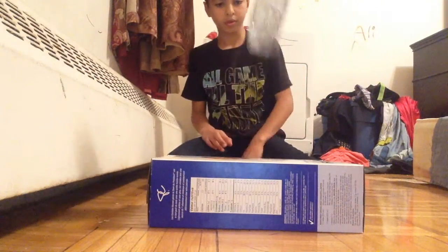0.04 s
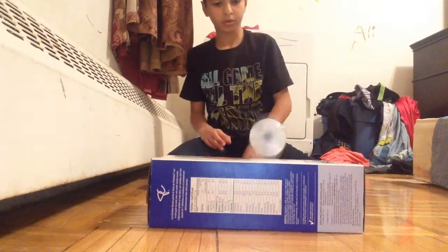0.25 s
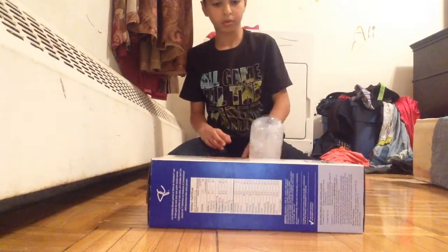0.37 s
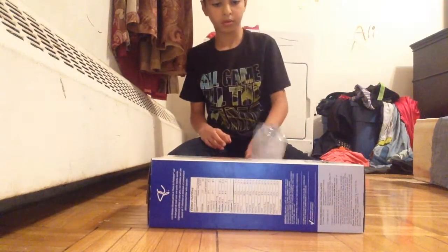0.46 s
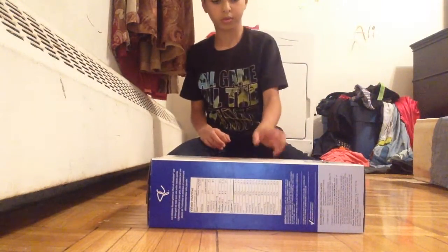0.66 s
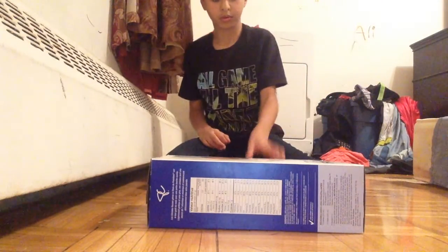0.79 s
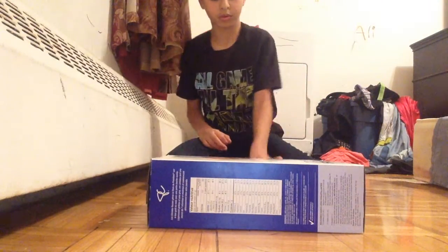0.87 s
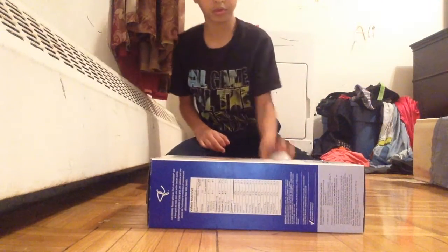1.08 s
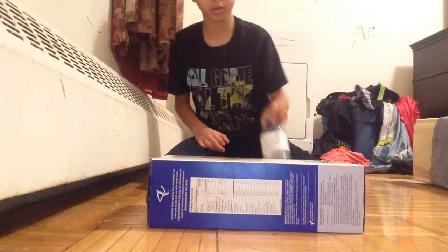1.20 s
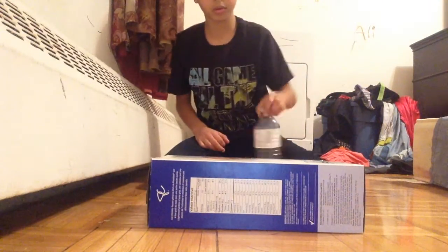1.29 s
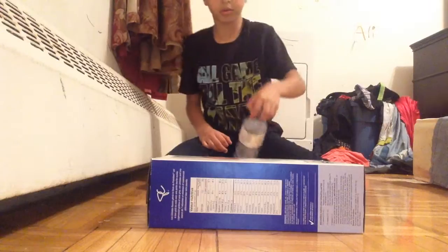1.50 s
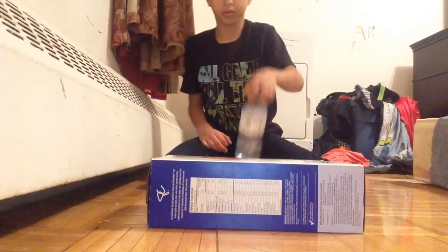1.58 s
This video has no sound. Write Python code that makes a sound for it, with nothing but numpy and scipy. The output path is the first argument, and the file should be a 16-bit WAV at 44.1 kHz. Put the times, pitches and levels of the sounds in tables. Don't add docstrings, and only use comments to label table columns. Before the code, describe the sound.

A part-filled plastic water bottle lands on a hollow cardboard box, then knocks onto a wooden floor

```python
import sys
import numpy as np
from scipy import signal
from scipy.fft import rfft, irfft
from scipy.io import wavfile
from scipy.ndimage import uniform_filter1d

SR = 44100
rng = np.random.default_rng(int(sys.argv[2]) if len(sys.argv) > 2 else 0)


def pcm_store(signal):
    levels = np.round(np.clip(np.atleast_2d(signal), -1, 1) * 32767)
    wavfile.write(sys.argv[1], SR, levels.astype(np.int16).T)


def elevation(decibels):
    levels = np.asarray(decibels, float)
    return 10 ** (levels / 20)


N = 72765

# [f/Hz, level/dB, t60/s]
NECK_MODES = [(647, -32, 0.11), (800, -8.5, 0.03), (884, -8, 0.058), (1046, 5, 0.014), (1354, -4.5, 0.016),
              (1589, -8, 0.032), (2144, 0.5, 0.015)]


def evened(x):
    return x / np.sqrt(np.mean(x ** 2) + 1e-20)


def read(points, hz):
    f, value = np.transpose(points)
    return np.interp(np.log(hz + 1), np.log(f + 1), value)


def add(mix, s, sound):
    at = round(s * SR)
    sound = sound[max(-at, 0):]
    part = mix[max(at, 0):][:len(sound)]
    part += sound[:len(part)]


def colour(x, points, tilt_db=0.):
    dull_hz = 6850
    hz = np.fft.rfftfreq(len(x), 1 / SR)
    shut = np.minimum(hz / points[0][0], 1) ** 2
    octaves = np.log2((hz + 20) / 2000)
    treble = (hz / dull_hz) ** 2 / (1 + hz / dull_hz)
    gain = elevation(read(points, hz) + tilt_db * (octaves + treble))
    return irfft(rfft(x) * shut * gain, len(x))


def still_air():
    # [f/Hz, level/dB per Hz]
    air_spectrum = [(40, -51.5), (100, -7), (165, -0.5), (280, -7.5), (500, -17.5), (1400, -16),
                    (5000, -25), (15500, -27)]
    return elevation(-61.5) * evened(colour(rng.standard_normal(N), air_spectrum))


def shuffle():
    # [t/s, level/dB]
    moves = [
        (0, -53.5),
        (0.152, -72),
        (0.299, -33.5),
        (.4, -48),
        (0.598, -34.5),
        (.76, -64),
        (.95, -62.5),
        (1.3, -60.5),
        (1.45, -65.5),
    ]
    s, db = np.transpose(moves)
    band = signal.butter(3, [135, 454], "bandpass", fs=SR, output="sos")
    rumble = evened(signal.sosfilt(band, rng.standard_normal(N)))
    return rumble * elevation(2 + np.interp(np.arange(N) / SR, s, db))


def grains(rows, spectrum):
    grains_per_s, spread_db, surge_db = 9000, 2.5, 1.3
    out, t = np.zeros(N), np.arange(22000) / SR
    size = elevation(spread_db * np.minimum(rng.exponential(1, (len(rows), 22000)), 5))
    draw = rng.uniform(-1, 1, size.shape)
    drops = size * np.sign(draw) * (abs(draw) < grains_per_s / SR)
    surge = evened(uniform_filter1d(rng.standard_normal(size.shape), size=350))
    drops = drops * elevation(surge_db * surge)
    for (s, swell, db, t60, tilt_db), d in zip(rows, drops):
        rise = np.sin(np.pi / 2 * np.minimum(t / swell, 1))
        fall = elevation(db - 60 * np.maximum(t - swell, 0) / t60)
        add(out, s, rise * fall * evened(colour(d, spectrum, tilt_db)))
    return out


def water_spray():
    # [start t/s, swell/s, level/dB, t60/s, tilt/dB per octave]
    sloshes = [(-.03, 0.017, -43, 0.28, 1.5), (.204, 0.051, -32.5, 0.28, 2), (.315, 0.029, -35, 0.21, 1.5),
               (.412, 0.016, -38, 0.59, -1), (.515, 0.0028, -35.5, 0.42, -2), (.645, 0.01, -40, 0.55, -2),
               (.685, 0.023, -31, 0.27, -1.5), (.85, 0.14, -60.5, 0.6, 2), (1.049, 0.039, -60, 0.35, 1.5),
               (1.13, 0.054, -56.5, 0.8, 1), (1.24, 0.024, -55, 0.43, 0.5)]
    # [f/Hz, level/dB per Hz]
    spray_spectrum = [(700, 3.5), (1300, 0), (2500, 0), (4500, -4), (7500, -11.5), (9500, -16.5),
                      (13500, -14.5), (15500, -22.5)]
    return grains(sloshes, spray_spectrum)


def climbing_notes(rows, rise_s):
    climb_per_s = .3
    out, t = np.zeros(N), np.arange(9000) / SR
    for s, hz, db, t60 in rows:
        shape = elevation(db - 60 * t / t60) * np.minimum(t / rise_s, 1)
        add(out, s, shape * np.sin(2 * np.pi * hz * (t + climb_per_s * t ** 2 / 2)))
    return out


def pings():
    # [t/s, f/Hz, level/dB, t60/s]
    ping_events = [(.002, 1690, -50, .05), (.007, 3350, -47, .035), (.028, 1690, -54, .08),
                   (.056, 700, -52, .05), (.2025, 2100, -15, .02), (.316, 2700, -29, .015),
                   (.337, 2600, -36, .04), (.472, 1480, -36, .03), (.5205, 3050, -28, .03),
                   (.5205, 5200, -34, .02), (.532, 2750, -33, .02), (.721, 2250, -35, .07)]
    return climbing_notes(ping_events, 0.00067)


def ticks():
    # [t/s, level/dB, length/s, tilt/dB per octave, rise/s]
    snaps = [(.2022, -21, 0.002, -2.5, 0.00035), (0.3135, -19, 0.0021, -1, .0006),
             (0.335, -32, 0.0022, -7.5, .001), (0.343, -39, .002, -1, 0.0014), (0.367, -37, .003, -4, .002),
             (0.4116, -22, 0.0026, -8.5, 0.0007), (0.505, -43, .002, -2.5, .001),
             (0.511, -38, 0.002, -5, .001), (0.521, -29, .003, -4, 0.0034),
             (.5525, -42, 0.0026, -3, 0.0017), (0.65, -56, 0.0013, -13, 0.00087),
             (.696, -27.5, 0.0014, -12, 0.0003), (0.073, -51.5, 0.008, -6.5, 0.0023),
             (1.621, -60.5, 0.0021, 2, .001)]
    # [f/Hz, level/dB]
    shell_spectrum = [(1500, -9), (3100, 0), (4800, -9), (6100, -7), (8500, -11), (11000, -4), (12300, -8),
                      (14200, -1)]
    lead_s, dent_depth = .004, 1.5
    out, t = np.zeros(N), np.arange(-lead_s, .04, 1 / SR)
    dent = dent_depth * (abs(t) < .5 / SR)
    for s, db, length, tilt_db, rise in snaps:
        swell = np.clip(1 + t / max(rise, 1e-4), 0, 1)
        fall = np.exp(-np.maximum(t, 0) / max(length, 1e-4))
        burst = (rng.standard_normal(len(t)) - dent) * swell * fall
        sound = colour(burst, shell_spectrum, tilt_db)
        add(out, s - lead_s, elevation(db) * sound / np.sqrt(np.sum(sound ** 2) / 300))
    return out


def knocks(rows, modes, blow=1, rise_s=1e-5):
    rattle_size, detune, most_cycles = .018, .01, 45
    out, t = np.zeros(N), np.arange(12000) / SR
    u = t[:4000]
    for s, db, contact, rattle in rows:
        fade = np.exp(-u / max(rattle, 1e-4)) * np.minimum(u / rise_s, 1)
        force = rattle_size * rng.standard_normal(4000) ** 3 * fade
        force[0] = blow
        push = u[:400] / max(contact, 2e-5)
        force = np.convolve(force, push * np.exp(-3 * push))
        ring = np.zeros(len(t))
        for hz, mode_db, t60 in modes:
            a, b = rng.uniform(-1, 1, 2)
            fall = elevation(mode_db + b - 60 * t / min(t60, most_cycles / hz))
            ring += fall * np.sin(2 * np.pi * hz * (1 + detune * a) * t)
        sound = signal.fftconvolve(force, ring)
        add(out, s, -elevation(db) * sound / np.sqrt(np.mean(sound[:900] ** 2)))
    return out


def box_knocks():
    # [t/s, level/dB, contact/s, rattle/s]
    hits = [
        (.2022, -10, 0.00025, 0.0077),
        (.2075, -14, 0.00023, 0.0032),
        (.2125, -8.5, 0.00051, 0.0077),
        (.2185, -19, 0.00021, 0.012),
        (.2215, -12.5, 0.00073, 0.0089),
        (.246, -16.5, .0005, 0.011),
        (.305, -30, 0.00085, 0.0065),
    ]
    # [f/Hz, level/dB, t60/s]
    box_modes = [(316.6, 3, 0.2), (339, -11, 0.081), (413.6, -3, 0.034), (457, 2.5, 0.035),
                 (540.5, -4, .03), (658, -2, 0.032), (738, -8.5, 0.031), (834, -4, 0.032),
                 (1020, -4.5, 0.026), (1086, -19.5, 0.021), (1240, -9, 0.017), (1300, -18, 0.016),
                 (2120, -7, 0.018), (3050, -8.5, 0.0095)]
    return knocks(hits, box_modes)


def glugs():
    # [t/s, f/Hz, level/dB, t60/s]
    pockets = [(.2025, 440, -11, .04), (.212, 314, -10, .15), (.224, 660, -18, .06), (.63, 885, -38, .12),
               (.652, 1000, -29, .04), (.69, 780, -22, .036), (.698, 572, -21, .07),
               (.699, 339, -14.5, .16), (.99, 910, -46, .06), (.99, 660, -46, .057),
               (1.144, 262, -49.5, .11), (1.29, 767, -50, .1), (1.3, 310, -50, .08), (1.366, 983, -49, .07)]
    return climbing_notes(pockets, .006)


def box_rocks():
    # [t/s, level/dB, contact/s, rattle/s]
    rocks = [
        (.2145, -24, 0.0014, 0.011),
        (.269, -28, 0.0018, 0.01),
        (.319, -28, 0.0022, 0.0048),
    ]
    # [f/Hz, level/dB, t60/s]
    side_modes = [(185.3, -13, 0.067), (213, 2.5, 0.085), (262, -3.5, 0.031)]
    return knocks(rocks, side_modes)


def hum():
    # [t/s, f/Hz, level/dB]
    tilt_path = [
        (.25, 315, -43),
        (0.298, 318, -24),
        (0.401, 320, -39),
        (0.509, 224.4, -39.5),
        (0.549, 270, -34.5),
        (0.588, 323.3, -28),
        (.65, 340, -36),
        (0.801, 344.8, -48),
        (0.889, 345, -43),
        (1.002, 340, -65),
    ]
    width_hz = 18
    s, hz, db = np.transpose(tilt_path)
    t = np.arange(N) / SR
    r = np.exp(-np.pi * width_hz / SR)
    noise = rng.standard_normal(N) + 1j * rng.standard_normal(N)
    slow = signal.lfilter([1], np.poly([r, r]), noise)
    slow = slow / (abs(slow) + .5 * np.abs(slow).mean())
    phase = 2 * np.pi * np.cumsum(np.interp(t, s, hz)) / SR
    tone = (slow * np.exp(1j * phase)).real
    return evened(tone) * elevation(np.interp(t, s, db, left=-120, right=-120))


def cap_knocks():
    # [t/s, level/dB, contact/s, rattle/s]
    hits = [
        (.313, -27.5, 0.00012, 0.012),
        (.5095, -31, 0.00056, 0.015),
        (.654, -29.5, 0.00017, 0.0066),
        (.6885, -27.5, 0.00025, 0.012),
    ]
    return knocks(hits, NECK_MODES)


def floor_knocks():
    # [t/s, level/dB, contact/s, rattle/s]
    hits = [
        (.411, -9, 0.00026, 0.0054),
        (.4158, -13.5, 0.00055, 0.012),
        (.4235, -15, 0.00031, 0.0043),
        (.439, -16.5, 0.00054, 0.012),
        (.5125, -23, 0.002, .0027),
        (.525, -41, .0015, 0.0089),
        (.547, -28, 0.0016, 0.011),
        (1.14, -39.5, 0.0032, 0.023),
        (1.172, -47, 0.002, 0.0071),
        (1.262, -57, 0.0016, 0.016),
    ]
    # [f/Hz, level/dB, t60/s]
    board_modes = [(206.5, -20, 0.034), (233, 7.5, 0.03), (361, 0.5, 0.078), (455, -2, 0.014),
                   (528, 5, .03), (654, -1, 0.014), (847, -4.5, 0.017), (1074, 4, 0.0093),
                   (1330, 13.5, 0.0052), (1680, -13.5, .01), (2030, -6.5, 0.0064), (2840, -20, .005),
                   (3615, -28, 0.0054)]
    return knocks(hits, board_modes)


def scuffs():
    # [t/s, level/dB, contact/s, rattle/s]
    drags = [
        (.632, -37.5, 0.00066, .026),
        (.92, -55.5, 0.00039, 0.032),
        (.95, -55, 0.000059, .035),
        (.99, -50.5, 0.00038, 0.0097),
        (1.038, -57.5, 0.00039, 0.081),
        (1.134, -50, 0.00019, 0.041),
        (1.258, -52.5, 0.0003, 0.042),
        (1.362, -59, 0.00042, 0.018),
    ]
    return knocks(drags, NECK_MODES, blow=0, rise_s=0.0051)


def side_knocks():
    # [t/s, level/dB, contact/s, rattle/s]
    hits = [
        (.696, -28.5, 0.0002, 0.002),
        (.7018, -21.5, 0.00012, 0.0026),
        (.87, -51.5, 0.00015, 0.011),
        (1.3, -51, 0.0016, .01),
    ]
    # [f/Hz, level/dB, t60/s]
    bottle_modes = [(355, -4.5, 0.14), (574, 5, 0.051), (720, -5, 0.024), (1230, -22, 0.018),
                    (1480, -6.5, .03), (1710, -6, 0.041), (2440, -29.5, 0.017), (2910, -29, .015)]
    return knocks(hits, bottle_modes)


def label_rustles():
    # [start t/s, swell/s, level/dB, t60/s, tilt/dB per octave]
    rustles = [
        (.94, 0.017, -62, 0.19, -2.5),
        (1.135, 0.0075, -60, 0.22, -2),
        (1.165, 0.019, -63.5, 0.18, -2.5),
        (1.262, 0.032, -59, 0.33, 2),
        (1.292, 0.017, -50.5, .08, 3.5),
    ]
    # [f/Hz, level/dB per Hz]
    label_spectrum = [(1200, 1.5), (3000, -11), (7500, -1.5), (8800, -18), (11000, -21.5), (12500, -6),
                      (15000, -14)]
    return grains(rustles, label_spectrum)


def room(x):
    # [delay t/s, level/dB]
    walls = [(.0075, -18), (.0118, -11), (.0205, -16), (.027, -17)]
    # [f/Hz, t60/s]
    decay = [(150, .33), (500, .26), (1300, .22), (6000, .26), (15000, .2)]
    taps = np.zeros(SR // 2)
    at = np.arange(500, len(taps) - 20, 20)
    taps[at + rng.integers(0, 20, len(at))] = rng.choice([-1., 1.], len(at))
    hz, t, z = signal.stft(taps, SR, nperseg=256)
    fall = elevation(-60 * t / read(decay, hz)[:, None])
    tail = signal.istft(z * fall, SR, nperseg=256)[1]
    tail = elevation(-12.5) * tail / np.linalg.norm(tail)
    add(tail, 0, np.ones(1))
    for s, db in walls:
        add(tail, s, elevation(db) * np.ones(1))
    return signal.fftconvolve(x, tail)[:N]


def scene():
    water = water_spray() + glugs()
    box = box_knocks() + box_rocks()
    floor = floor_knocks() + scuffs()
    bottle = pings() + ticks() + cap_knocks() + side_knocks() + label_rustles()
    thin = signal.butter(5, 178, "highpass", fs=SR, output="sos")
    near = signal.sosfilt(thin, room(water + box + floor + bottle))
    return (near + hum() + shuffle() + still_air())[None]


def top_cut(x):
    return signal.sosfilt(signal.butter(12, 16480, fs=SR, output="sos"), x)


def record(dry):
    ceiling, top_hz = .8, 15450
    x = ceiling * np.tanh(dry / ceiling)
    low_pass = signal.firwin(301, top_hz, window=("kaiser", 3), fs=SR)
    x = signal.oaconvolve(x, low_pass[None], "same")
    return top_cut(x)


dry = scene()
out = record(dry)
pcm_store(out)
```